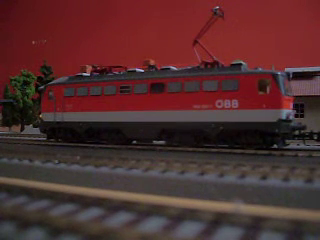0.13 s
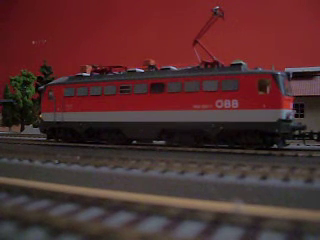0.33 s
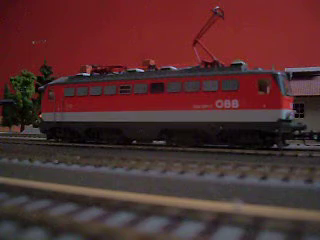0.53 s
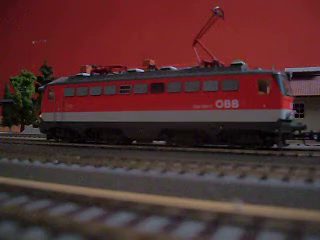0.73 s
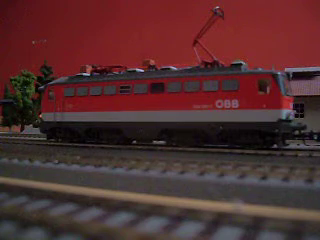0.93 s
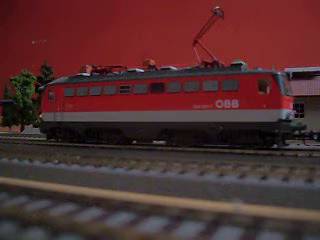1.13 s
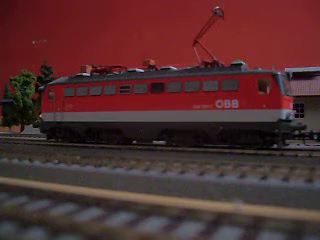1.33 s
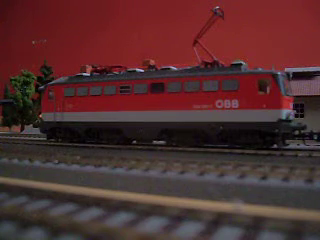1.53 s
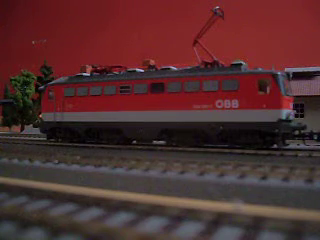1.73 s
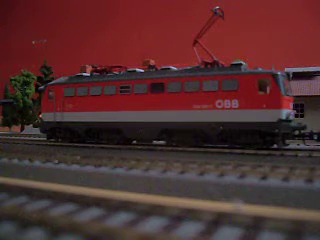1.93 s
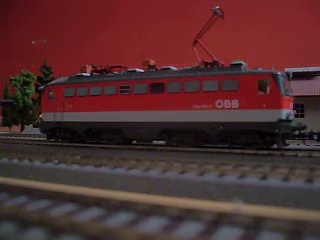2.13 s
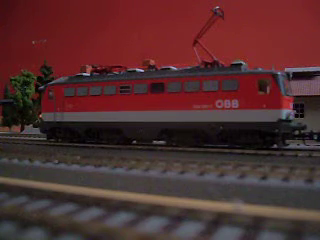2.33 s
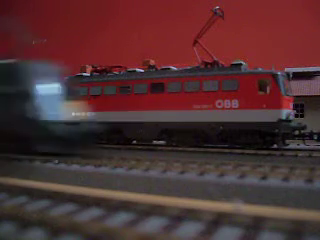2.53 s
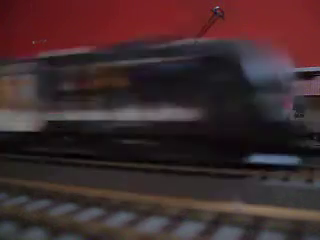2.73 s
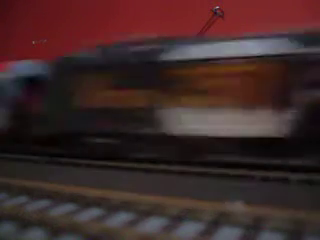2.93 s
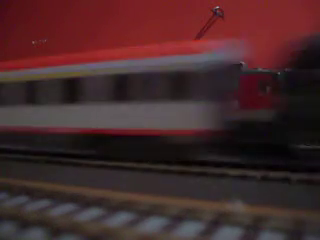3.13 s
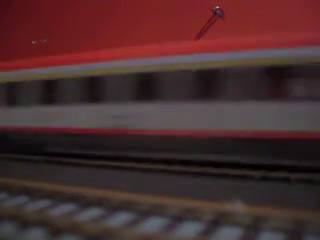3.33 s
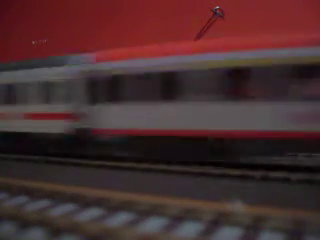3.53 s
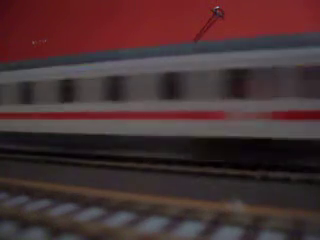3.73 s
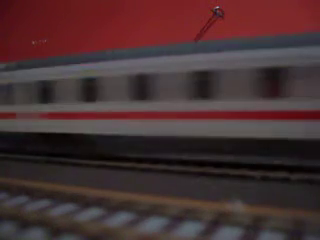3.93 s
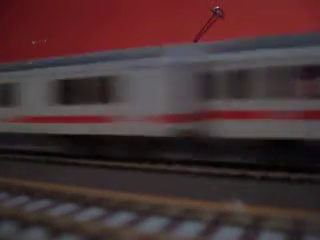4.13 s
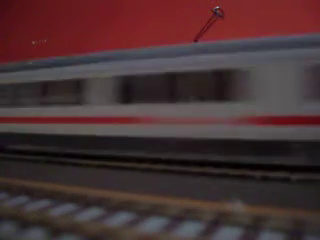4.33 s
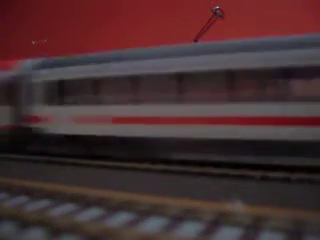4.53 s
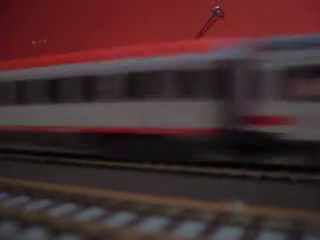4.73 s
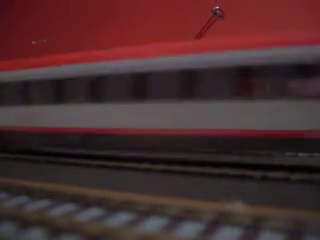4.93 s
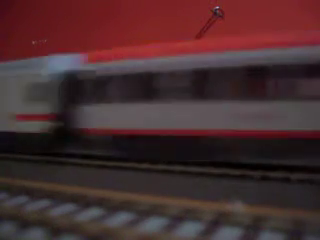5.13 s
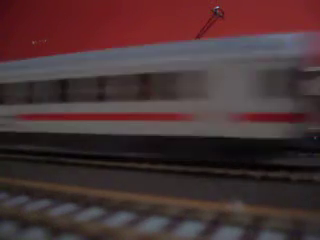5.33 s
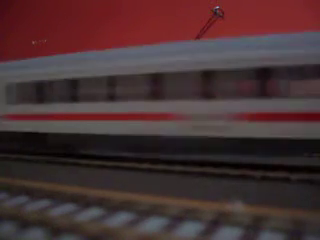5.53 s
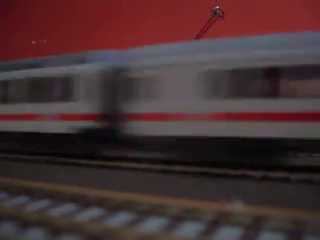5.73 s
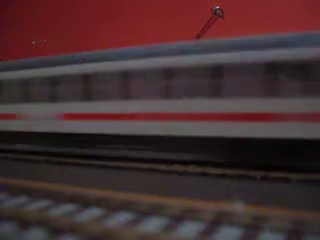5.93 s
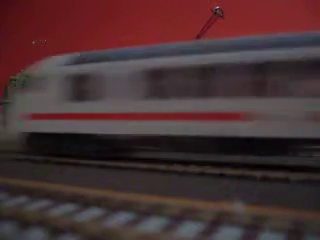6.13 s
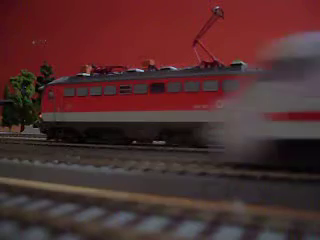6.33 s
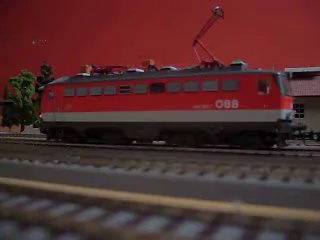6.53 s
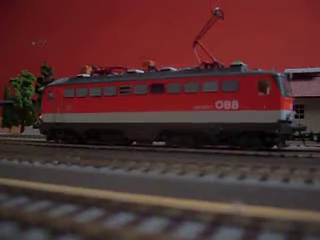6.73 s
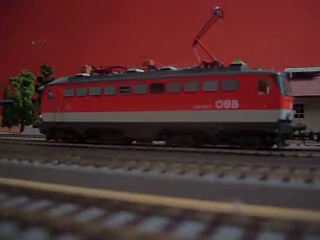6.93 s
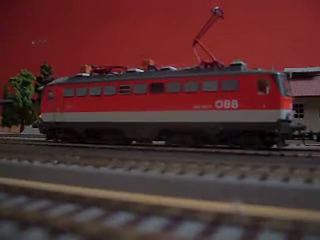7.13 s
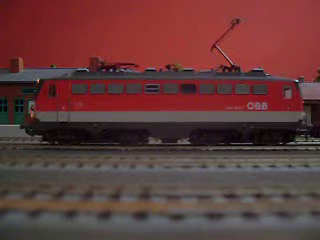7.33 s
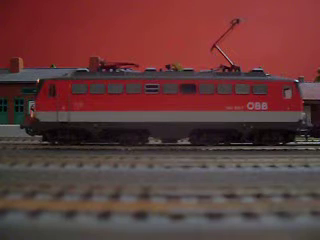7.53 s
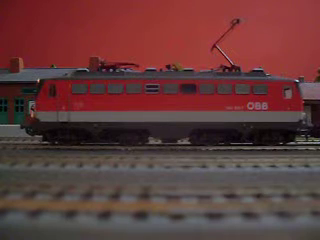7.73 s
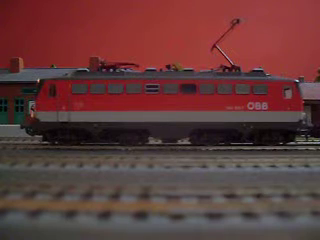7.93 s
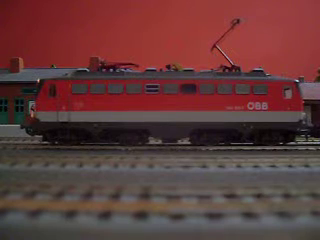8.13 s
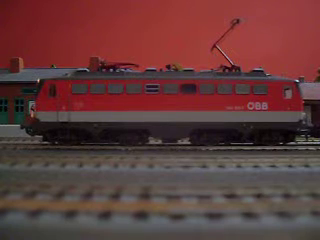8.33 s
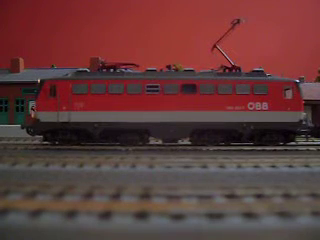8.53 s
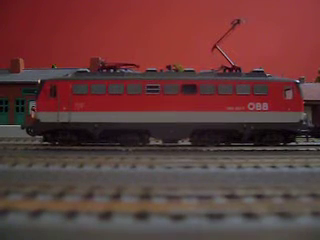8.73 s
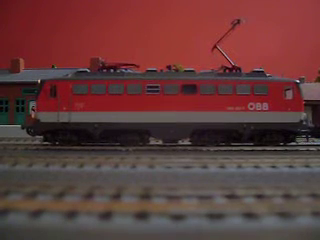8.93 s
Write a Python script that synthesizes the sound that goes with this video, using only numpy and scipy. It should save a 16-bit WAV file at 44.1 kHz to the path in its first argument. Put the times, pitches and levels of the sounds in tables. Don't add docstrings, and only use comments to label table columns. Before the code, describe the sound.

Small metal wheels hiss and clatter over track joints on a drumming wooden board, before the sound drops suddenly to a quiet, thin whine.

```python
import sys
import numpy as np
from scipy import signal
from scipy.io import wavfile

SR = 44100
rng = np.random.default_rng(int(sys.argv[2]) if len(sys.argv) > 2 else 0)


def magnitude_from_level(level_db):
    exponent = np.asarray(level_db, float) / 20
    return 10 ** exponent


def unload_wav(signal):
    wavfile.write(
        sys.argv[1],
        SR,
        np.round(np.clip(np.atleast_2d(signal).T, -1, 1) * 32767).astype(np.int16),
    )


N = 396900
STEP = 32
CHANGE_S = 7.2895
NEAR_DB = -40

# t/s, level/dB
NEARNESS = [(0, -48.5), (2.0, -47.5), (2.24, -46.5), (2.5, -46), (2.95, -43.5), (3.4, -41.5), (3.6, -40),
            (3.73, -40.5), (3.87, -39.5), (3.97, -40), (4.07, -39.5), (4.5, -40), (4.88, -39.5),
            (5.1, -40.5), (6.1, -41), (6.3, -42), (6.5, -43), (7.28, -46)]
# f/Hz, level/dB, time to fade by 60 dB/s
TICK_MODES = [(9600, 0, .004), (8200, -3, .003), (10700, -8, .002), (6200, -4, .005)]
# f/Hz, level/dB, time to fade by 60 dB/s
WHEEL_MODES = [(1940, -2, 0.02), (2500, -3, 0.0084), (3500, 4, 0.0048), (4740, 4, 0.0045),
               (5760, 11.5, 0.011)]
# t/s, tick peak level/dB, wheel ring level/dB
LEADING_AXLES = [(2.2072, -46, -34.5), (3.003, -40, -30.5), (3.3957, -40, -35), (3.4222, -34, -38),
                 (3.6212, -37, -34), (3.7843, -35, -33), (3.8117, -41, -30.5), (3.909, -42, -45),
                 (3.936, -32, -33), (4.1696, -29, -35), (4.2971, -32, -39), (4.3251, -38, -38),
                 (4.4633, -38, -36), (4.7092, -34, -37), (4.8733, -37.5, -31.5), (5.032, -34, -34),
                 (5.2799, -34, -33.5), (5.4081, -32, -30.5), (5.4365, -39, -34), (5.581, -37.5, -36.5),
                 (5.7262, -40, -38.5), (5.8202, -33, -40), (5.902, -45, -45), (5.9614, -39, -37),
                 (5.9898, -41, -32.5), (6.1255, -36, -36), (6.35, -35, -33), (6.4906, -35, -32.5),
                 (6.5136, -39, -32), (6.8818, -38, -34.5)]
# t/s, tick peak level/dB, wheel ring level/dB
TRAILING_AXLES = [(2.2626, -49, -44), (3.0714, -37, -34.5), (3.464, -36, -39), (3.4805, -36, -31.5),
                  (3.6774, -44, -42), (3.8412, -38, -34), (3.8681, -39, -32), (3.9669, -41, -34),
                  (3.9933, -36.5, -36), (4.2276, -34, -42), (4.357, -33, -29.5), (4.3849, -38, -32.5),
                  (4.5156, -35, -33), (4.7701, -37, -37), (4.9248, -29, -32), (5.0923, -34, -31),
                  (5.3296, -35, -34), (5.4685, -36, -31.5), (5.4974, -40, -35.5), (5.6423, -37, -33.5),
                  (5.7862, -41, -35), (5.8795, -37.5, -36), (6.0202, -35.5, -34), (6.0477, -38, -39),
                  (6.1823, -37, -37), (6.4087, -36, -36), (6.5495, -36, -36), (6.572, -37, -36),
                  (6.9359, -37, -38)]
# t/s, tick peak level/dB, wheel ring level/dB
LONE_AXLES = [(1.8146, -51, -41), (2.039, -52, -50), (2.6708, -44, -39.5), (3.1914, -37, -41),
              (3.6049, -43, -37), (4.0854, -36, -33), (5.0654, -45, -40), (5.1761, -42, -43),
              (5.2041, -35, -38), (5.3698, -41.5, -39), (5.7149, -41.5, -42), (6.1035, -43, -30),
              (6.1587, -41.5, -42), (6.6712, -41, -51)]


def rms_one(x):
    return x / np.sqrt(np.mean(x ** 2) + 1e-20)


def in_time(rows, step=1):
    s, *columns = np.transpose(rows)
    t = np.arange(0, N, step) / SR
    return [np.interp(t, s, column) for column in columns]


def at_hz(points, hz):
    table_hz, table_db = np.transpose(points)
    return np.interp(np.log(hz), np.log(table_hz), table_db)


def filtered(x, order, hz, kind):
    return signal.sosfilt(signal.butter(order, hz, kind, fs=SR, output="sos"), x)


def drift(rate):
    r = np.exp(-2 * np.pi * rate * STEP / SR)
    noise = rng.standard_normal(N // STEP + 2001)
    return rms_one(signal.lfilter([1], [1, -2 * r, r * r], noise)[2000:])


def sung(hz, width):
    r = np.exp(-np.pi * width / SR)
    w = 2 * np.pi * hz / SR
    return rms_one(signal.lfilter([1, 0, -1], [1, -2 * r * np.cos(w), r * r], rng.standard_normal(N)))


def strike(times, peak_db, modes, scatter_db, scrape_s):
    at = (np.asarray(times) * SR).astype(int)
    out = np.zeros(N)
    luck = rng.standard_normal((len(at), len(modes)))
    n = np.arange(128)
    fade = np.exp(-n / (scrape_s * SR))
    crunch = rng.choice([-1, 1], (len(at), 128)) * fade / np.sqrt(np.sum(fade ** 2))
    for k, (hz, level_db, t60) in enumerate(modes):
        r = magnitude_from_level(-60 / (t60 * SR))
        w = 2 * np.pi * hz / SR
        share = np.maximum(abs(crunch @ np.exp(-1j * w * n)), 0.5)
        strength = magnitude_from_level(peak_db + level_db + scatter_db * luck[:, k]) / share
        force = np.full(N, 1e-18)
        np.add.at(force, at[:, None] + n, strength[:, None] * crunch)
        out += signal.lfilter([0, np.sin(w)], [1, -2 * r * np.cos(w), r * r], force)
    return out


def zone_levels(step):
    # level beside the train/dB, share of the roar's swing,
    # level added by the engine/dB, level far away/dB
    zones = [
        (-71, 0.2, 8, -78),
        (-54, 0.99, 3, -68),
        (-43, 1.24, 0, -65.7),
        (-41, 1, 0.7, -63),
        (-55, 1.24, 1, -71),
    ]
    engine_s, comes_s, goes_s = 3.06, 0.45, 0.67
    far_swell_s, far_swell_length_s, far_swell_db = 8.06, 0.078, 1
    t = np.arange(0, N, step) / SR
    engine = np.exp(-((t - engine_s) / np.where(t < engine_s, comes_s, goes_s)) ** 2)
    beside_db, share, engine_db, far_db = np.transpose(zones)[:, :, None]
    near = beside_db + share * (in_time(NEARNESS, step)[0] - NEAR_DB) + engine_db * engine
    far = far_db + far_swell_db * np.exp(-((t - far_swell_s) / far_swell_length_s) ** 2)
    return np.where(t >= CHANGE_S, far, near)


def camera():
    frame_hz, lines_per_frame = 14.985, 525
    whine_db, low_noise_db = -73.8, -85
    frames = frame_hz * np.arange(N) / SR
    after = np.arange(N) >= CHANGE_S * SR
    field = np.tanh(7 * np.sin(2 * np.pi * (frames - np.where(after, 0.125, 0.175))))
    level = magnitude_from_level(whine_db + 2 * field - 1.5 * ~after) * np.sqrt(2)
    line = 2 * np.pi * lines_per_frame * frames
    whine = level * (np.cos(1.1) * np.sin(line) + np.sin(1.1) * field * np.cos(line))
    low_noise = filtered(rng.standard_normal(N), 1, 70, "low")
    return whine + magnitude_from_level(low_noise_db) * rms_one(low_noise)


def board_hum():
    # f/Hz, width/Hz, level beside the train/dB
    resonances = [(199, 10, -74), (569, 42, -66.5), (745, 72, -64)]
    # t/s, length/s, level/dB
    motor_swells = [(2.281, .1, -73), (3.17, 0.13, -69), (3.72, .08, -69), (3.93, .1, -67), (4.8, .08, -75),
                    (5.2, .15, -73), (5.6, .08, -78), (6.2, 0.42, -75.5)]
    rumble_db = zone_levels(1)[0]
    t = np.arange(N) / SR
    hum = sum(magnitude_from_level(level_db) * sung(hz, width) for hz, width, level_db in resonances)
    swell = sum(magnitude_from_level(db) * np.exp(-((t - s) / length) ** 2) for s, length, db in motor_swells)
    drone = swell * magnitude_from_level(-1.0) * sung(112.4, 5.4)
    return hum * magnitude_from_level(rumble_db - rumble_db.max()) + drone


def far_joints():
    # t/s, peak level/dB
    crossings = [(7.3807, -56), (7.5258, -55), (7.656, -58), (7.7618, -52.5), (7.8057, -56), (8.0501, -57),
                 (8.5545, -58), (8.5874, -62), (8.6233, -59), (8.6653, -56), (8.8114, -56), (8.9426, -56)]
    s, db = np.transpose(crossings)
    far = strike(s, db - 4, WHEEL_MODES[3:] + TICK_MODES[3:], scatter_db=1.5, scrape_s=0.0002)
    return filtered(far, 2, 2500, "high")


def board_knocks():
    # f/Hz, level/dB, time to fade by 60 dB/s
    board_modes = [(127, -16, .07), (192, -2.5, 0.034), (272, -5, 0.024), (404, -7.5, 0.056),
                   (609, 11, 0.046), (750, 11.5, 0.04)]
    # t/s, peak level/dB
    heavy_axles = [(2.205, -52.5), (2.595, -48), (2.666, -48), (2.825, -51), (2.998, -48), (3.064, -59),
                   (3.221, -53), (3.392, -49), (3.461, -43), (3.542, -60), (3.619, -64), (3.759, -50),
                   (4.211, -50), (4.364, -64), (4.754, -52), (5.026, -55), (5.087, -61.5), (5.575, -54),
                   (6.343, -60), (6.474, -65), (6.54, -61), (7.137, -60)]
    # t/s, peak level/dB
    far_axles = [(7.591, -61), (7.761, -61), (8.559, -65), (8.728, -53.5)]
    s, _, ring_db = np.transpose(LEADING_AXLES + TRAILING_AXLES + LONE_AXLES)
    knocks = strike(s + 0.0005 + 0.00204, ring_db - 17 - 12, board_modes[3:], scatter_db=2, scrape_s=0.00002)
    s, db = np.transpose(heavy_axles + far_axles)
    knocks += strike(s, db - 4.5, board_modes[:4], scatter_db=2.0, scrape_s=0.00002)
    return filtered(knocks, 2, 90, "high")


def odd_blows():
    # t/s, peak level/dB
    gap_drop = [
        (7.146, -30),
    ]
    # f/Hz, level/dB, time to fade by 60 dB/s
    drop_modes = [(5850, 6.5, .004), (3030, 3, 0.0038), (1910, -2, 0.0059), (450, -23, 0.0061)]
    # t/s, peak level/dB
    engine_clack = [(2.2075, -46), (3.0035, -35.5), (3.0716, -42)]
    # t/s, peak level/dB
    far_scuff = [(8.051, -60), (8.057, -60), (8.066, -58), (8.072, -60)]
    blows = strike(*np.transpose(gap_drop), drop_modes, scatter_db=1, scrape_s=0.00002)
    blows += strike(*np.transpose(engine_clack), WHEEL_MODES[:2], scatter_db=1, scrape_s=0.0003)
    blows += strike(*np.transpose(far_scuff), WHEEL_MODES[:4], scatter_db=2.5, scrape_s=0.001)
    return filtered(blows, 2, 250, "high")


def rattle():
    count, level_db, spread_db = 500, -51, 2
    luck = rng.random((count, 2))
    s = luck[:, 0] * (CHANGE_S - 0.02)
    near_db = np.interp(s, *np.transpose(NEARNESS)) - NEAR_DB
    db = level_db - spread_db * np.log(luck[:, 1] + 0.1) + 1.5 * near_db
    return strike(s, db, TICK_MODES[:3], scatter_db=4.5, scrape_s=0.0012)


def wheel_ticks(bounce_s, bounce_db):
    s, tick_db, ring_db = np.transpose(LEADING_AXLES + TRAILING_AXLES + LONE_AXLES)
    hits = strike(s, tick_db - 1, TICK_MODES[:3], scatter_db=1.2, scrape_s=0.0012)
    hits += strike(s, ring_db - 4, WHEEL_MODES[:4], scatter_db=2, scrape_s=0.0004)
    hits = filtered(hits + rattle(), 5, [900, 10600], "band")
    lag = round(bounce_s * SR)
    hits[lag:] += magnitude_from_level(bounce_db) * hits[:-lag].copy()
    return hits


def rolling(judder_db, patchy_db, grit_per_s, grit_db):
    zone_tops_hz = [450, 1300, 2700, 7300]
    # f/Hz, level per Hz/dB
    colour_coming = [(41, -58), (70, -33), (113, -18.5), (146, -27.5), (194, -20.5), (453, -14.5),
                     (563, -19.5), (1260, -2.5), (1700, 8), (3200, 3), (5510, 3), (7970, -49), (9900, -41),
                     (11000, -44), (12600, -50), (16300, -80), (22000, -120)]
    # f/Hz, level per Hz/dB
    colour_beside = [(41, -60), (70, -42), (113, -25.5), (263, -28.5), (484, -21), (575, -9), (747, -7.5),
                     (1150, -11.5), (1980, -5.5), (2750, -6), (4060, -5.5), (7800, -12.5), (9690, -11),
                     (10800, -20), (12600, -36), (16300, -76), (22000, -120)]
    # f/Hz, level per Hz/dB
    colour_leaving = [(180, -55), (300, -25), (510, -14), (578, -9), (743, -5), (1080, -10.5), (2080, 4.5),
                      (2630, -4), (3660, -1), (5160, -7), (5940, -7), (7620, -29), (9790, -15),
                      (11800, -62), (12600, -46), (16300, -78), (22000, -120)]
    # f/Hz, level per Hz/dB
    colour_distant = [(70, -3.5), (250, -6.5), (700, 0), (1250, -1.5), (2300, 0), (3700, -5), (5000, -4.5),
                      (7000, -11), (9500, -11), (10500, -13), (11500, -26), (12500, -39)]
    # t/s, share beside 0-1, share leaving 0-1
    place = [(2.6, 0.9, 0.04), (3.5, 0.64, 0.38), (4.0, 0.79, 0.26), (4.8, 0.83, 0.15), (5.2, 0.85, .05),
             (5.8, 0.16, 0.95), (6.6, 0.55, 0.7), (7.2, 0.6, 0.4)]
    # t/s, centre f/Hz, lift level/dB
    hollow = [(0, 3130, 4), (2.4, 3100, 2.5), (3.3, 3640, -1.5), (3.75, 3770, 0), (4.1, 3900, 4.5),
              (4.9, 3900, -1.5), (5.5, 3700, 4), (6.15, 3540, 0.5), (6.32, 4170, 10.5), (6.37, 3800, 0),
              (6.68, 3640, 6.5), (6.9, 3380, 2.5), (7.28, 3200, 4.5)]
    after = np.arange(0, N, STEP) >= CHANGE_S * SR
    zone_db = zone_levels(STEP)
    beside, leaving = np.clip(in_time(place, STEP), 0, 1)
    hollow_hz, lift_db = in_time(hollow, STEP)
    speck = rng.random(N) < grit_per_s / SR
    grit = speck * magnitude_from_level(grit_db + 1.1 * np.minimum(rng.exponential(1, N), 4))
    rough = rng.standard_normal((2, N)) + grit * rng.choice([-1, 1], N)
    judder = judder_db * (drift(70) + 0.27 * drift(30))
    low_edges = 70 * 2 ** np.arange(0, 4.2, 0.25)
    edges = np.append(low_edges, 1300 * 2 ** np.arange(0.12, 3.4, 0.125))
    sound, power = np.zeros((5, N)), np.zeros((5, len(after)))
    for k, (low, high) in enumerate(zip(edges, edges[1:])):
        hz = np.sqrt(low * high)
        coming_db = at_hz(colour_coming, hz)
        leaving_db = at_hz(colour_leaving if hz > 450 else colour_coming, hz)
        near_db = coming_db + beside * (at_hz(colour_beside, hz) - coming_db)
        near_db = near_db + leaving * (leaving_db - coming_db)
        hollow_db = lift_db * ~after * np.exp(-(np.log(hz / hollow_hz) / 0.097) ** 2)
        gain = magnitude_from_level(np.where(after, at_hz(colour_distant, hz), near_db)) * np.sqrt(high - low)
        band = rms_one(filtered(rough[k % 2], 2, [low, high], "band"))
        zone = np.searchsorted(zone_tops_hz, hz)
        moving = gain * magnitude_from_level(hollow_db + judder + patchy_db * drift(12))
        sound[zone] += band * np.repeat(moving, STEP)[:N]
        power[zone] += gain ** 2
    zone_gain = np.repeat(magnitude_from_level(zone_db) / np.sqrt(power), STEP, axis=1)[:, :N]
    return np.sum(sound * zone_gain, axis=0)


def scene():
    blows = far_joints() + board_knocks() + odd_blows() + wheel_ticks(bounce_s=0.003, bounce_db=-9)
    train = rolling(judder_db=0.83, patchy_db=0.98, grit_per_s=220, grit_db=7.5)
    return (camera() + board_hum() + blows + train)[None]


def top_cut(x):
    return signal.sosfilt(signal.butter(12, 12720, fs=SR, output="sos"), x)


def record(dry):
    mix = signal.sosfilt(signal.cheby2(7, 40, 13250, fs=SR, output="sos"), dry)
    return top_cut(mix)


dry = scene()
out = record(dry)
unload_wav(out)
```